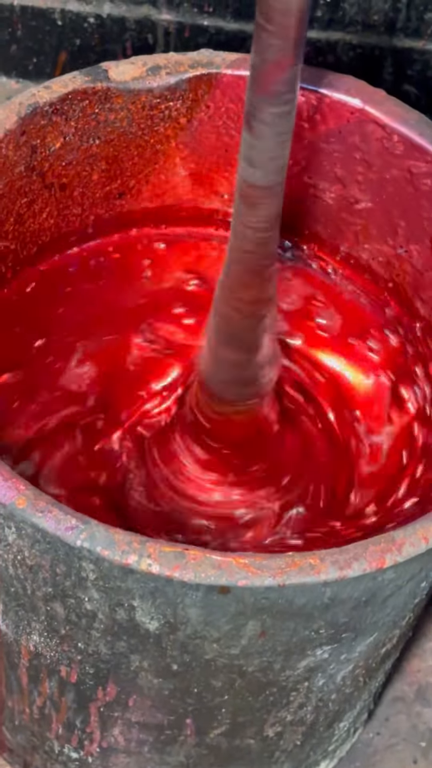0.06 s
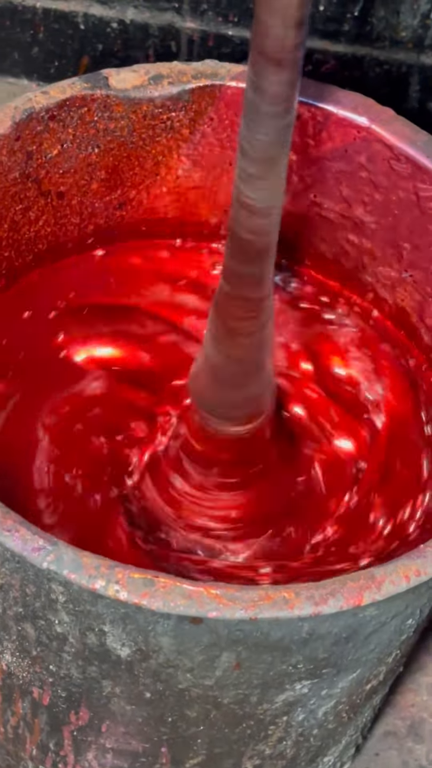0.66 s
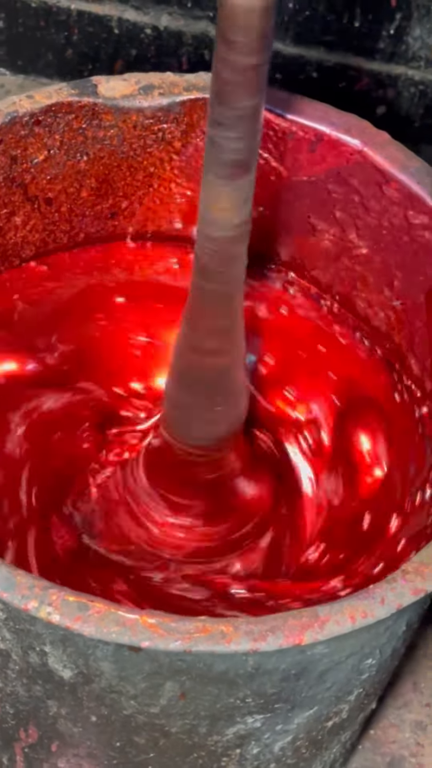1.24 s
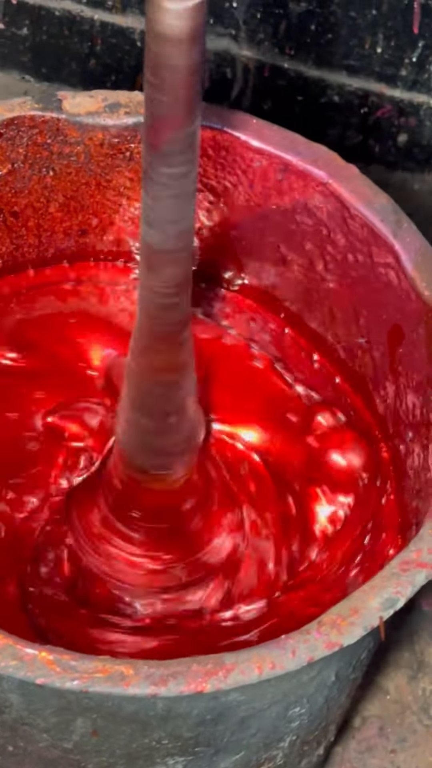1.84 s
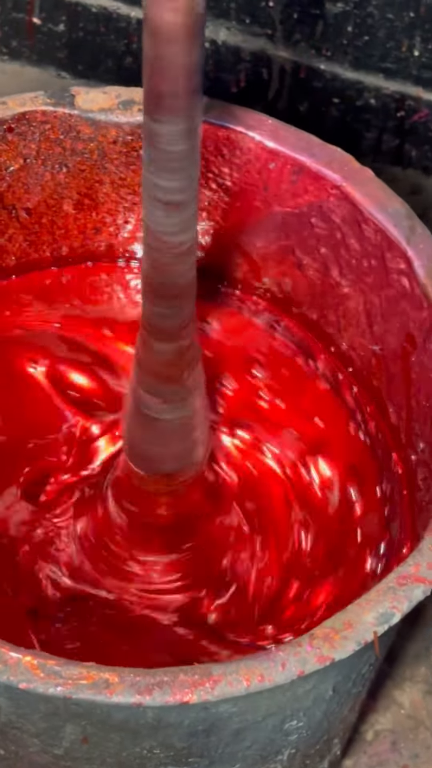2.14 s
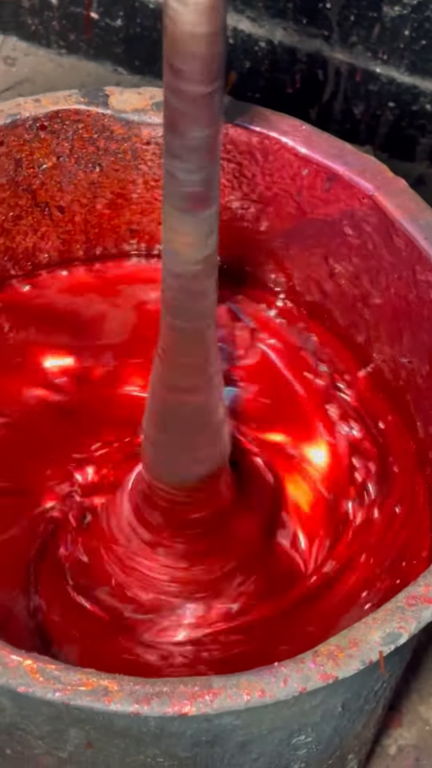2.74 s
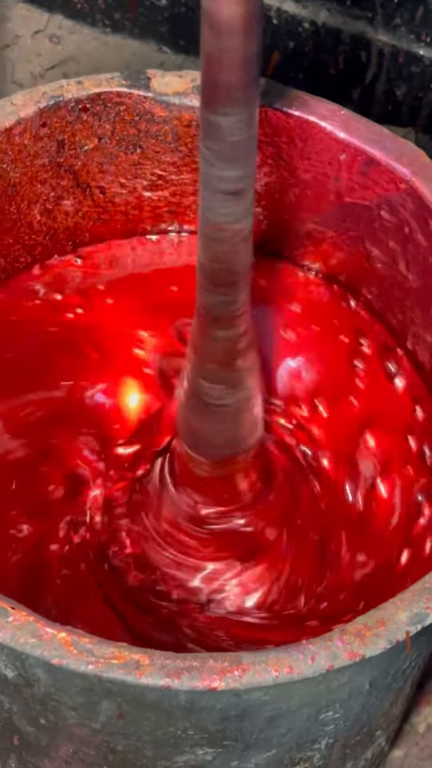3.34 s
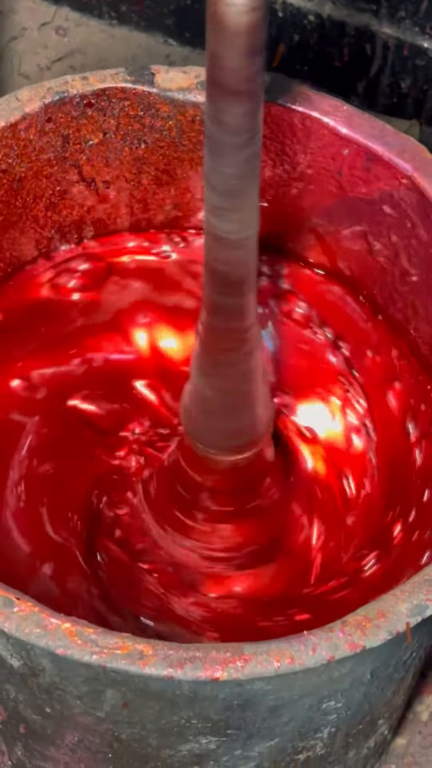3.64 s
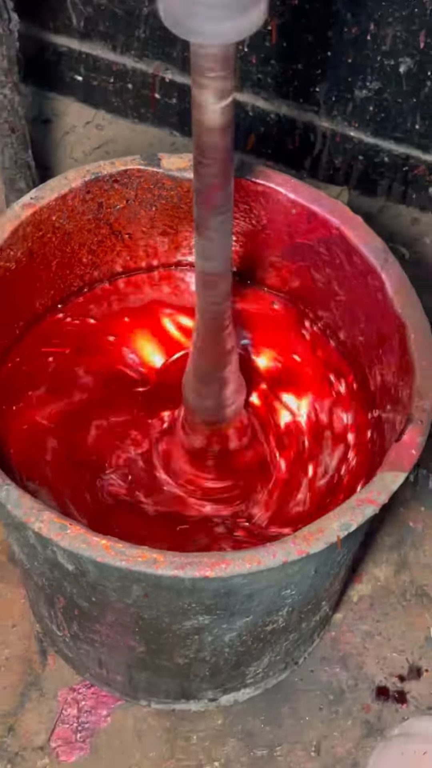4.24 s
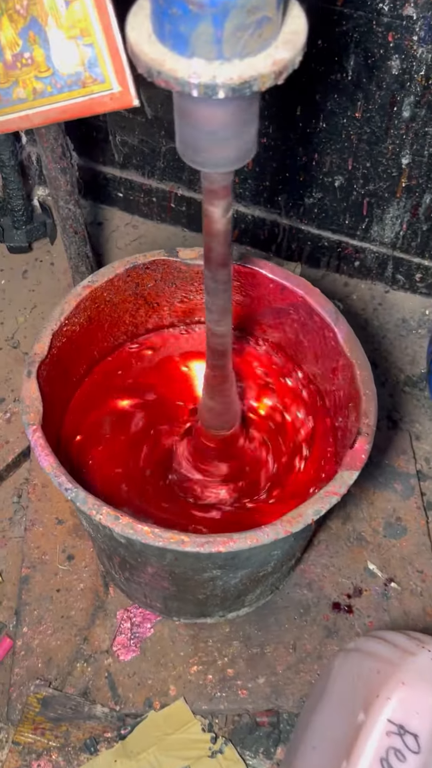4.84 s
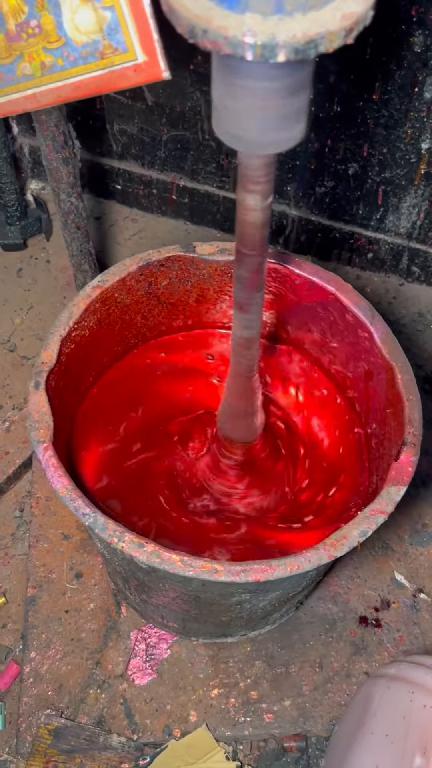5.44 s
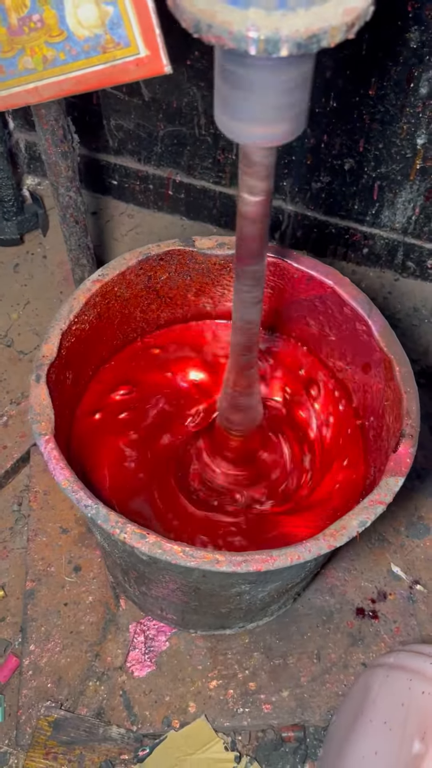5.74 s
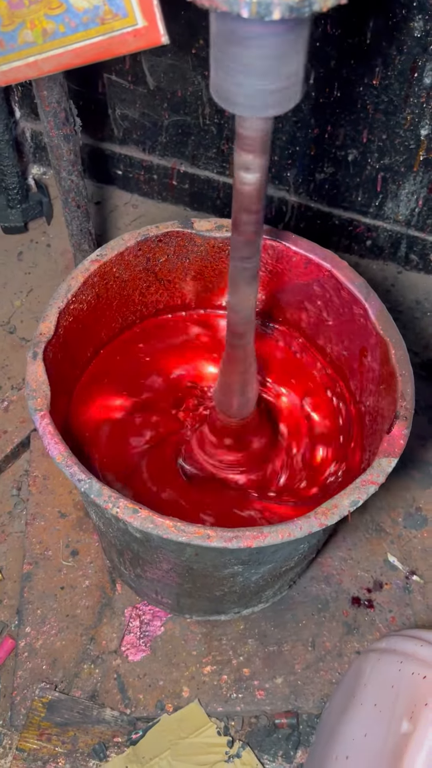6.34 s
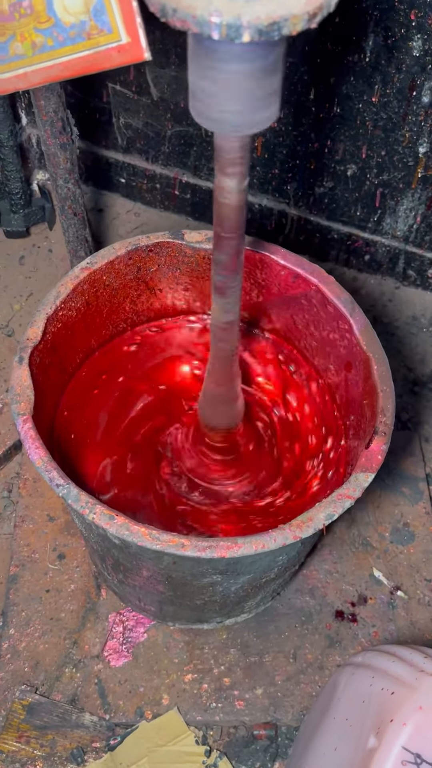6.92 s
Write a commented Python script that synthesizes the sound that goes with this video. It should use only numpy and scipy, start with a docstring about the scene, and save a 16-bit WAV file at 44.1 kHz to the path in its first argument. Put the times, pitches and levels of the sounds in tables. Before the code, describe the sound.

A motor-driven shaft churns thick paint in a bucket, close by in a workshop, for about seven seconds. From the start the paint gulps, gurgles and slaps continuously, with a hollow bucket resonance and a fine spatter of droplets. Brief splashes and tiny bubble pops are scattered through it, the clearest splashes near 0.6, 2.3 and 3.5 seconds. The vortex holds a faint breathy note, and from about 1.8 seconds adds short, wavering hoots. From around 4 seconds the throaty gulps come thicker and a little stronger. Beneath the paint, the motor gives a steady low hum and rumble, a light whine and a very high, thin whistle that flares briefly, most at the start and near 5 seconds. Its fan rasp becomes clearer from about 4.2 seconds and peaks near 5.4. The churning carries on to the end.

```python
"""Thick paint gulps, slaps and spatters in a bucket, churned by a motor-driven shaft close by in a workshop.
The vortex swallows air pockets, which pulsate and ring the bucket; a wave circles the wall, bubbles pop,
sheets of paint burst into drops, and the air funnel round the shaft hoots at its resonances.
Throughout, the motor hums, its fan cowl rasps and its speed drive whistles thinly, with brief flares."""
import sys
import numpy as np
from scipy import signal
from scipy.fft import rfft, irfft
from scipy.io import wavfile
from scipy.ndimage import uniform_filter1d

SR = 44100
rng = np.random.default_rng(int(sys.argv[2]) if len(sys.argv) > 2 else 0)


def waveform_to_disk(signal):
    """Save audio, clipped to [-1, 1], as 16-bit WAV at the path in sys.argv[1]."""
    frames = np.transpose(np.atleast_2d(signal))
    scaled = np.clip(frames, -1, 1) * 32767
    samples = np.round(scaled).astype(np.int16)
    wavfile.write(sys.argv[1], SR, samples)


N = 307818
TIME = np.arange(N) / SR
FREQ = np.arange(N // 2 + 1) * SR / N

# modes of the bucket's air column and wall: (frequency [Hz], bandwidth [Hz], gain [dB])
BUCKET_MODES = [(125, 16, -8.5), (158, 7.4, -0.5), (207, 15, 0), (231.7, 14.4, -0.5), (295.2, 21.4, 5),
                (308, 8.7, 0.5), (351.2, 9.2, 6.5), (400, 22, 5.5), (445, 17, -15), (475, 20, -13.5),
                (687, 36, -0.5), (818, 23, -3), (872, 16.6, 3), (980, 18, -0.5), (1012, 35, -10),
                (1117, 91, -6), (1156, 50, -14), (1272, 34, -6)]
# modes of the steel shaft and bearing housing: (frequency [Hz], bandwidth [Hz], gain [dB])
STEEL_MODES = [(1970, 120, -6), (3300, 140, -13), (4250, 110, -10), (5200, 160, -10)]
# the listener moves over the rim, then back to face the motor:
# (time [s], gain of the bucket's modes [dB], cowl level [dB], spatter level [dB])
LISTENER_PATH = [(0, -4, -56, -32.5), (1, -7, -46, -33.5), (2, 2, -66, -32), (3, 5.5, -60, -34),
                 (4.2, 3, -45, -32), (4.8, 2.5, -40.5, -33.5), (5.4, -3, -37, -35.5), (6.2, -0.5, -40, -32),
                 (6.98, 1.5, -38.5, -34)]
# rotation of the shaft and of the wave circling the wall: (rate [Hz], time of one crest [s])
SHAFT, SWIRL = (14.12, .006), (2.583, .38)


def undb(db):
    """Amplitude ratio of a level in decibels."""
    return 10 ** (np.asarray(db) / 20)


def unit(x):
    """A signal scaled to rms 1."""
    return x / np.sqrt(np.mean(x ** 2))


def even(x, span_s=0.1):
    """A signal divided by its running rms, which removes slow surges."""
    return x / np.sqrt(uniform_filter1d(x ** 2, int(span_s * SR)))


def curve(table, column):
    """One column of a table, interpolated linearly in time."""
    rows = np.array(table)
    return np.interp(TIME, rows[:, 0], rows[:, column])


def across(points):
    """(frequency [Hz], value) points, interpolated on a log-frequency axis."""
    hz, value = np.transpose(points)
    return np.interp(np.log(FREQ + 1), np.log(hz + 1), value)


def add(track, start_s, sound):
    """Superpose a sound on a track."""
    start = int(np.clip(start_s * SR, 0, N - 1))
    track[start:start + len(sound)] += sound[:N - start]


def swing(hz, crest_s):
    """Simple harmonic motion between -1 and 1."""
    return np.cos(2 * np.pi * hz * (TIME - crest_s))


def band_noise(hz, width_hz):
    """Noise in a Gaussian band, rms 1."""
    band = np.exp(-.5 * ((FREQ - hz) / width_hz) ** 2)
    return unit(irfft(rfft(rng.standard_normal(N)) * band, N))


def drift(width_hz):
    """Slow random fluctuation: low-pass noise of rms 1."""
    return band_noise(0, width_hz)


def clicks(per_s, spread_db):
    """Shot noise: tiny random impacts, a few much stronger than the rest."""
    size = undb(spread_db * np.minimum(rng.exponential(size=N), 2 * np.e))
    return unit((rng.random(N) < per_s / SR) * size * rng.choice([-1, 1], N))


def bursts(per_s, fall_s):
    """Power envelope of Poisson-timed bursts with exponential decay, mean 1."""
    hits = (rng.random(N) < per_s / SR) * rng.uniform(.2, 1, N) ** 2
    power = signal.lfilter([1], [1, -np.exp(-1 / (fall_s * SR))], hits)
    return power / power.mean()


def resonate(x, spectrum, modes, ring_gain=1):
    """Forced vibration: a spectrally shaped excitation plus the damped modes it drives, rms 1."""
    shaped = rfft(x) * undb(across(spectrum))
    response = sum(undb(db) * 1j * FREQ * width / (hz ** 2 - FREQ ** 2 + 1j * FREQ * width)
                   for hz, width, db in modes)
    return unit(irfft(shaped, N) + ring_gain * irfft(shaped * response, N))


def breathy(hz, width_hz, clear=0):
    """A resonance driven by turbulence: narrow-band noise round a moving pitch, plus any clear tone."""
    phase = 2 * np.pi * np.cumsum(hz) / SR
    return (clear + drift(width_hz)) * np.cos(phase) + drift(width_hz) * np.sin(phase)


def bubble(hz, cycles, glide):
    """A damped pulsation that peaks after `cycles` periods, its pitch risen by the fraction `glide`."""
    age = np.arange(int(2 * np.pi * cycles * SR / hz)) * hz / SR / cycles
    envelope = np.e * age * np.exp(-age)
    return envelope * np.sin(2 * np.pi * (cycles * (age + glide * age ** 2 / 2) + rng.random()))


def pockets(low_hz, high_hz, count, glide=0.046):
    """Entrained air pockets pulsate, each at its natural frequency, over the noise of the flow."""
    out = np.zeros(N)
    for when, pitch, size in rng.random((count, 3)):
        hz = low_hz * (high_hz / low_hz) ** pitch
        add(out, when * N / SR, (size + .2) ** -.3 * bubble(hz, 1.3, glide))
    return unit(out) + rng.standard_normal(N)


def sloshed(x, delay_s=.00022, pace_hz=5):
    """Heaving paint alters the bucket's air space; a wandering delay bends its resonances slightly."""
    return np.interp(TIME + delay_s * drift(pace_hz), TIME, x)


def churning():
    """Air entrained by the vortex and slaps on the wall drive the bucket's modes."""
    # strength of the flow, relative: (time [s], deep gulps [dB], lighter gulps [dB], slaps [dB])
    levels = [(0.0, -27.5, -29, -29), (0.35, -30, -29.5, -29), (0.36, -25.5, -26.5, -29),
              (0.67, -26.5, -30.5, -29.5), (1.2, -26.5, -28, -27), (2.21, -26.5, -26, -26),
              (3.42, -27.5, -29.5, -26.5), (3.63, -24, -24.5, -26.5), (4.44, -28.5, -33, -25.5),
              (4.63, -24.5, -26, -26), (5.07, -26.5, -23.5, -25), (5.15, -31, -28, -23),
              (5.27, -25, -25, -25.5), (6.71, -27, -24, -26), (6.9, -25, -23.5, -25.5)]
    # spectra of large pockets, smaller pockets and slaps: (frequency [Hz], relative level [dB])
    deep_spectrum = [(100, -36), (175, -11), (210, -9), (300, -3), (370, -1), (450, -10), (800, -45)]
    gulp_spectrum = [(200, -8), (330, -8), (400, -9.5), (470, -3), (560, -2), (680, -9.5), (850, -8),
                     (1500, -44), (4000, -70)]
    slap_spectrum = [(250, -17), (550, -7), (780, -3.5), (1120, -4), (1400, -11), (1700, -14.5),
                     (2100, -18.5), (3200, -50), (8000, -68)]
    ring_gain = undb(curve(LISTENER_PATH, 1))

    deep = even(resonate(pockets(187.8, 394.6, count=2600), deep_spectrum, BUCKET_MODES, ring_gain))
    deep *= undb(curve(levels, 1) - 0.6)
    gulps = even(resonate(pockets(381, 739, count=2000), gulp_spectrum, BUCKET_MODES, ring_gain))
    gulps *= undb(curve(levels, 2) - 0.93)
    impacts = rng.standard_normal(N) * np.sqrt(1 + bursts(per_s=70, fall_s=0.0087))
    slaps = even(resonate(impacts, slap_spectrum, BUCKET_MODES, ring_gain))
    slaps *= undb(curve(levels, 3) + 1.27 + 0.67 * swing(*SWIRL))
    surge = undb(0.86 * drift(8.7))
    return sloshed(deep + (gulps + slaps) * surge) * undb(0.06 * swing(*SHAFT))


def funnel_note(waver_hz=6):
    """Cavity resonance: turbulence blows a hollow, breathy note in the air funnel round the shaft."""
    # resonance of the funnel: (time [s], frequency [Hz], level [dB])
    resonance = [(0, 800, -34), (.6, 752, -34.5), (1, 700, -56), (1.5, 565.5, -34.5), (2.2, 558.5, -31.5),
                 (3.2, 566.3, -31), (4, 560.2, -33.5), (5.3, 558.6, -31), (6.2, 553, -37), (6.98, 562, -38)]
    note = breathy(curve(resonance, 1) + waver_hz * drift(14.4), width_hz=12, clear=0.6)
    return even(note, span_s=0.22) * undb(curve(resonance, 2))


def spatter(shaft_db=1.1, swirl_db=0.5, mist=1.25):
    """Torn films shed droplets whose shot noise rings the steel, modulated by shaft and circling wave."""
    # spectrum of the droplets: (frequency [Hz], relative level [dB])
    spectrum = [(700, -25), (1500, -5.5), (2100, -3.5), (2650, 0.5), (3300, -4.5), (3900, -7.5),
                (5200, -9.5), (6200, -12), (7300, -13.5), (9000, -11), (10500, -14.5), (11600, -10),
                (13300, -19.5), (15500, -12.5)]
    tearing = np.sqrt(.6 + .4 * bursts(per_s=70, fall_s=.009))
    droplets = clicks(per_s=2500, spread_db=2.5) + mist * rng.standard_normal(N)
    level_db = curve(LISTENER_PATH, 3) + shaft_db * swing(*SHAFT) + swirl_db * swing(*SWIRL)
    return resonate(droplets, spectrum, STEEL_MODES) * undb(level_db) * tearing


def motor(hum_hz=104, hum_db=-46, rumble_db=-37.5, throb_db=1.5, flicker_db=2.0):
    """Motor vibration: rumble, hum and singing iron, which throbs as the circling wave loads the shaft."""
    # bands in which the iron sings: (frequency [Hz], width [Hz], level [dB])
    iron_bands = [(8070, 80, -56), (8980, 70, -55), (14960, 115, -46)]
    # spectrum of the rumble: (frequency [Hz], relative level [dB])
    spectrum = [(30, -36), (48, -18), (70, -14.5), (95, -3), (120, -2), (150, -9), (180, -5), (260, -13.5),
                (600, -62)]
    load = swing(*SWIRL)
    singing = sum(undb(db + throb_db * load + flicker_db * drift(22)) * band_noise(hz, width)
                  for hz, width, db in iron_bands)
    rumble = undb(rumble_db) * resonate(rng.standard_normal(N), spectrum, BUCKET_MODES)
    hum = undb(hum_db) * band_noise(hum_hz, 3.1)
    return rumble + hum + singing


def fan_cowl():
    """Quick bursts of rattling excite the modes of the fan cowl, heard as a rasp."""
    # spectrum of the rattle: (frequency [Hz], relative level [dB])
    spectrum = [(1200, -28), (1800, 1.5), (2200, 14.5), (2600, 4.5), (2900, -14), (3200, -31), (4500, -15),
                (5100, 11.5), (5600, -24), (7000, 5), (9500, 9.5), (12000, -39), (15000, 10)]
    # modes of the cowl: (frequency [Hz], bandwidth [Hz], gain [dB])
    modes = [(2000, 160, 10), (2530, 290, 4.8), (4860, 160, 2.02)]
    rattle = rng.standard_normal(N) * np.sqrt(bursts(per_s=140, fall_s=0.0054))
    return resonate(rattle, spectrum, modes) * undb(curve(LISTENER_PATH, 2))


def housing_whine(fin_hz=2858, flicker_db=3.5):
    """The fan's rasp drives a cavity resonance of the motor housing; the cooling fins ring beside it."""
    # the housing as the listening angle shifts: (time [s], rasp centre [Hz], rasp [dB], fins [dB])
    housing = [(0, 2750, -45, -49), (.35, 2610, -48, -48), (.7, 2555, -42, -58), (1.4, 2580, -47, -46),
               (1.8, 2530, -46, -44), (2.4, 2690, -63, -56), (3.2, 2490, -42, -47), (4.3, 2600, -61, -53),
               (4.8, 2687, -47, -58), (5.4, 2670, -39, -60), (5.8, 2710, -50, -48), (6.4, 2780, -50, -53),
               (6.98, 2730, -47, -53)]
    cavity = breathy(curve(housing, 1), width_hz=75)
    rasp = unit(cavity * np.sqrt(1 + bursts(per_s=71, fall_s=0.0044)))
    fins = band_noise(fin_hz, 28) * undb(flicker_db * drift(15))
    return rasp * undb(curve(housing, 2)) + fins * undb(curve(housing, 3))


def drive_whistle(field_hz=28.6, flare_s=0.03, waver_db=1.2):
    """Modulation by the motor's rotating field splits each switching tone into a pair of sidebands."""
    # switching tones of the speed drive: (frequency [Hz], resting level per sideband [dB])
    tones = [(13852, -59), (14236, -65)]
    # brief flares of the whistle: (time [s], tone [index], level per sideband [dB])
    flares = [(.04, 0, -41), (.12, 1, -47), (.18, 0, -51), (.21, 1, -44), (.32, 0, -44), (.59, 0, -54),
              (1.07, 0, -50), (1.15, 0, -53), (1.24, 1, -51), (1.46, 0, -49), (1.56, 1, -52),
              (1.66, 0, -48), (2.15, 0, -51), (2.23, 0, -52), (2.34, 0, -51), (2.67, 0, -52),
              (2.77, 1, -54), (3.45, 1, -51), (3.47, 0, -49), (3.94, 0, -50), (4.25, 1, -52),
              (4.27, 0, -48), (4.88, 0, -50), (5.04, 0, -40), (5.42, 0, -49), (5.53, 0, -45),
              (5.75, 0, -52), (5.89, 0, -46), (6.11, 0, -45), (6.28, 0, -47), (6.66, 0, -47),
              (6.87, 0, -46)]
    out = np.zeros(N)
    for tone, (hz, rest_db) in enumerate(tones):
        sidebands = sum(np.sin(2 * np.pi * (hz + side * field_hz) * TIME + 1.2 * drift(8))
                        for side in (-1, 1))
        flaring = sum(undb(db) * np.exp(-.5 * ((TIME - peak_s) / flare_s) ** 2)
                      for peak_s, which, db in flares if which == tone)
        out += sidebands * np.hypot(undb(rest_db), flaring) * undb(waver_db * drift(8))
    return out


def popping(ring_s=0.00073, glide=0.0076):
    """Small bubbles resonate briefly as they burst: a few clear chirps among many tiny ones."""
    # clear pops at the surface: (time [s], frequency [Hz], relative level [dB])
    pops = [(0.441, 8100, -33), (0.608, 4000, -30), (0.845, 3460, -24), (1.921, 3700, -25),
            (2.63, 3700, -30), (3.092, 2520, -22), (3.752, 4650, -29), (5.264, 8420, -30),
            (5.332, 2610, -23), (5.479, 3200, -31), (5.746, 7250, -33), (6.954, 6700, -33)]
    out = np.zeros(N)
    for time_s, hz, db in pops:
        add(out, time_s - 0.81 * ring_s, undb(db + 4) * bubble(hz, hz * ring_s, glide))
    for when, pitch, size in rng.random((500, 3)):
        hz = 1800 * 6 ** pitch
        db = -47 + 14 * size ** 2 - 7 * pitch
        add(out, when * N / SR, undb(db) * bubble(hz, 4., glide))
    return out


def splashing(gain_db=7.0, split_hz=6000, rise_s=.001, hold_s=.008):
    """Atomisation: sheets of paint burst into coarse drops that splat and fine ones that fizz."""
    # bursting sheets, levels relative: (peak time [s], splat [dB], fizz [dB], power decay time [s])
    splashes = [(0.03, -33.5, -38, 0.0073), (0.148, -38, -49, .003), (0.205, -37, -37.5, 0.0069),
                (0.39, -33, -43, 0.011), (0.557, -29, -36, 0.012), (0.8, -33, -39.5, 0.0054),
                (0.915, -41, -42, .008), (1.06, -36.5, -41, 0.016), (1.163, -33.5, -42, 0.0081),
                (1.84, -34, -38, 0.0088), (1.915, -34.5, -38, 0.014), (2.328, -28.5, -34, 0.0053),
                (2.468, -55, -43, .005), (2.63, -34, -44, 0.0096), (3.042, -35, -39, 0.0067),
                (3.148, -45, -45, .003), (3.403, -39, -46, 0.004), (3.469, -34, -44, 0.01),
                (3.504, -28.5, -36, 0.009), (3.68, -38, -46, 0.004), (3.748, -43, -46, 0.003),
                (4.193, -39, -42, .006), (4.245, -45, -47, .003), (4.677, -38, -39, 0.018),
                (5.047, -36, -36, 0.0099), (5.39, -41, -36.5, .013), (5.478, -44, -55, 0.0049),
                (5.741, -42, -40, 0.0065), (6.621, -33, -35, 0.013), (6.95, -41, -40, .012)]
    # bright spectrum of the shower: (frequency [Hz], relative level [dB])
    spectrum = [(600, -27), (1500, 5), (2600, 5), (3700, 1.5), (5200, 2.5), (7000, 2), (9000, 2.5),
                (11600, 4), (13500, -4), (15500, -22)]
    splat_power, fizz_power = np.zeros(N), np.zeros(N)
    for peak_s, splat_db, fizz_db, fall_s in splashes:
        age = TIME - peak_s
        shower = np.exp(np.where(age < 0, age / rise_s, -np.maximum(age - hold_s, 0) / fall_s))
        splat_power += undb(splat_db) ** 2 * shower
        fizz_power += undb(fizz_db) ** 2 * shower
    drops = resonate(clicks(per_s=2400, spread_db=1.5), spectrum, STEEL_MODES)
    coarse = irfft(rfft(drops) / (1 + (FREQ / split_hz) ** 8), N)
    fine = drops - coarse
    return undb(gain_db) * (coarse * np.sqrt(splat_power) + fine * np.sqrt(fizz_power))


def gurgling(ring_s=0.00753, glide=0.013, knock_cycles=0.93):
    """Damped oscillation: large air pockets collapse with throaty notes, among a few short, dull knocks."""
    # collapsing air pockets: (peak time [s], frequency [Hz], level [dB])
    gulps = [(0.386, 310, -19), (0.47, 370, -26), (0.522, 303, -20), (0.566, 335, -18), (0.694, 331, -18),
             (0.76, 323, -19), (0.796, 294, -18), (0.985, 348, -21), (1.07, 537, -20), (1.381, 308, -18),
             (2.001, 548, -18), (2.087, 301, -20), (2.341, 385, -14), (2.374, 434, -15), (2.456, 284, -18),
             (2.661, 303, -14.5), (3.502, 334, -18), (3.577, 496, -31), (3.675, 347, -17.5),
             (3.733, 369.4, -21), (3.776, 308, -16.5), (3.862, 304, -17.5), (4.129, 301, -21),
             (4.193, 560, -16), (4.252, 352, -19), (4.475, 490, -18), (4.571, 351, -14.5),
             (4.626, 294, -18), (4.687, 296.5, -14.5), (4.755, 290, -20), (4.702, 1076, -18.5),
             (4.839, 1084, -19), (4.898, 485, -18), (4.959, 846, -21), (5.008, 465, -17),
             (5.015, 1118, -25), (5.179, 487, -16), (5.404, 460, -14.5), (5.42, 397, -17.5),
             (5.49, 298, -22), (5.56, 440, -17), (5.745, 531, -18), (5.756, 1054, -20), (5.772, 882, -21),
             (5.884, 295, -23), (5.925, 370, -17), (5.946, 352, -18), (6.01, 853, -18), (6.119, 548, -17.5),
             (6.206, 460, -12.5), (6.28, 352, -17), (6.476, 290, -18.5), (6.54, 512, -18),
             (6.612, 570, -16), (6.723, 877, -18.5), (6.804, 292, -21), (6.947, 487, -10.5),
             (6.97, 416, -14)]
    # short, dull low knocks within the churning: (peak time [s], frequency [Hz], level [dB])
    knocks = [(0.355, 487, -16.5), (1.271, 565, -11), (1.321, 986, -20), (5.735, 590, -14),
              (6.267, 627, -23)]
    out = np.zeros(N)
    for peak_s, hz, db in gulps:
        add(out, peak_s - ring_s, undb(db) * bubble(hz, hz * ring_s, glide))
    for peak_s, hz, db in knocks:
        add(out, peak_s - knock_cycles / hz, undb(db) * bubble(hz, knock_cycles, glide=0))
    return out


def hooting(swell_s=0.02, waver_hz=5):
    """The air funnel pinches round the shaft and sounds one of its resonances in a short, wavering note."""
    # hoots of the funnel: (peak time [s], frequency [Hz], level [dB])
    hoots = [(1.8, 978, -26), (2.061, 554, -24), (2.204, 880, -27), (2.231, 559, -26), (2.367, 976, -21.5),
             (2.401, 558, -22), (2.49, 562, -24), (2.571, 564, -27), (2.64, 710, -25), (2.762, 553, -20),
             (2.78, 872, -32), (2.905, 963, -24.5), (3.0, 560, -25), (3.0, 698, -31), (3.197, 886, -30),
             (3.27, 710, -24), (3.401, 863, -29), (3.741, 876, -25.5), (3.83, 552, -22.5),
             (4.306, 563, -23), (4.469, 897, -24), (4.571, 976, -28), (4.735, 557, -19), (4.83, 542, -24),
             (4.973, 556, -23), (5.109, 848, -31), (5.347, 558, -20), (5.422, 863, -28), (5.449, 563, -25),
             (5.952, 875, -24), (6.007, 970, -24), (6.177, 562, -21), (6.299, 866, -25), (6.891, 884, -28)]
    out = np.zeros(N)
    phase_drift = 2 * np.pi * np.cumsum(waver_hz * drift(13.97)) / SR
    for peak_s, hz, db in hoots:
        near = np.abs(TIME - peak_s) < 4 * swell_s
        age = TIME[near] - peak_s
        envelope = undb(db) * np.exp(-.5 * (age / swell_s) ** 2)
        out[near] += envelope * np.sin(2 * np.pi * hz * age + phase_drift[near])
    return out


def stereo_field(x, reverb_s=.3):
    """Direct sound differs in phase and level at two close points; the walls add a diffuse field."""
    # phase difference: (frequency [Hz], lead of left over right [rad])
    phase_lead = [(0, -0.0), (1300, -0.2), (2000, 0.8), (2450, 2.2), (2750, 2.65), (2900, 2.5), (3600, 1.2),
                  (4600, 1.7), (5050, 0.8), (5600, 3.1), (6100, 3.4), (7700, 6.3), (8600, 6.5),
                  (10500, 9.4), (11100, 9.5), (13100, 12.5), (14300, 13.3), (15500, 15.7)]
    # level difference: (frequency [Hz], left minus right [dB])
    balance = [(60, 0.0), (110, 0.0), (200, 1.0), (380, 1.4), (700, 2.5), (1290, 3.0), (2380, 0.0),
               (4400, 0.0), (8120, 0.0), (15000, 0.0)]
    # scattered sound that differs between the sides: (frequency [Hz], level re direct sound [dB])
    diffuse = [(60, -33), (250, -23), (600, -11), (1200, -7), (2500, -10), (4800, -8), (5800, -17),
               (7000, -9), (9500, -9), (10800, -20), (12000, -9), (15000, -11)]
    wash = rfft(rng.standard_normal(N) * undb(-60 * TIME / reverb_s))
    wash = wash / np.sqrt(np.mean(np.abs(wash) ** 2)) * undb(across(diffuse))
    side = np.array([[1], [-1]])
    gain = undb(side * across(balance) / 2)
    lead = np.interp(FREQ, *np.transpose(phase_lead))
    return irfft(rfft(x) * (1 + side * wash) * gain * np.exp(.5j * side * lead), N)


def scene():
    """Superposition of paint and machine; the cowl is straight ahead and reaches both sides at once."""
    paint = churning() + funnel_note() + hooting() + gurgling() + spatter() + splashing() + popping()
    machine = motor() + housing_whine() + drive_whistle()
    return stereo_field(paint + machine) + fan_cowl()


def record(dry):
    """Band limiting: steep filters remove the deepest bass and the highest treble."""
    highpass = signal.butter(8, 40, "highpass", fs=SR, output="sos")
    lowpass = signal.ellip(12, .2, 80, 15130, fs=SR, output="sos")
    return signal.sosfilt(lowpass, signal.sosfilt(highpass, dry))


dry = scene()
out = record(dry)
waveform_to_disk(out)
```